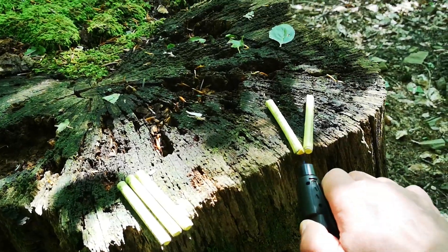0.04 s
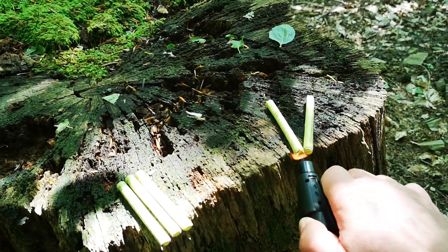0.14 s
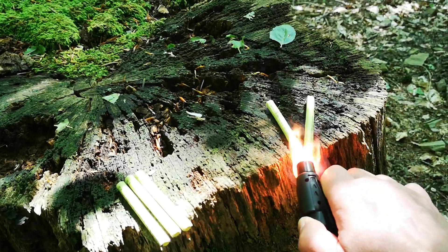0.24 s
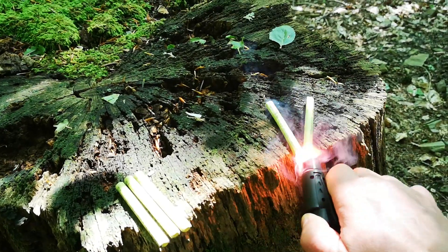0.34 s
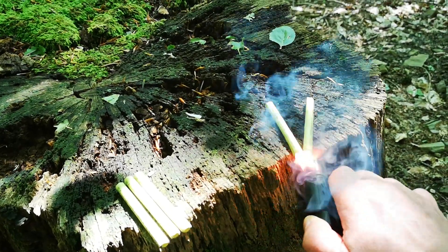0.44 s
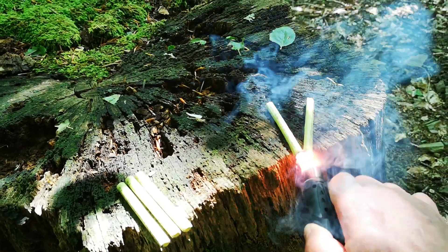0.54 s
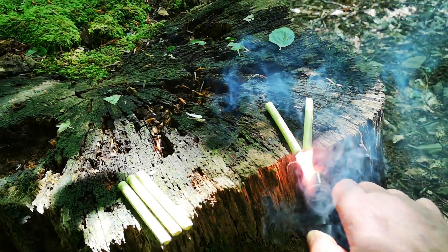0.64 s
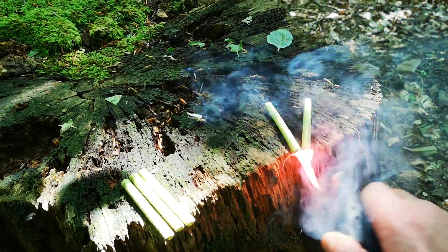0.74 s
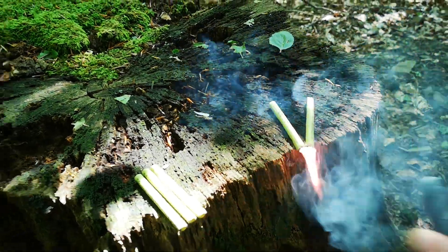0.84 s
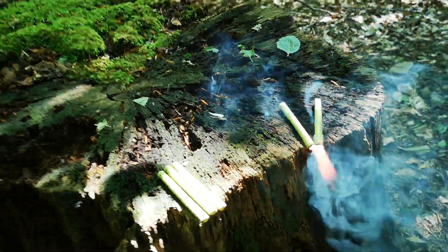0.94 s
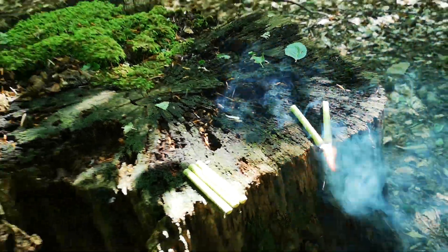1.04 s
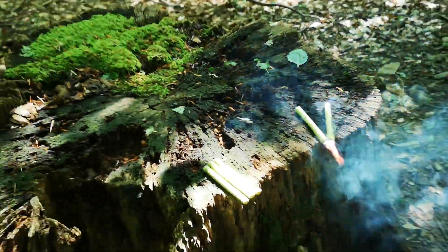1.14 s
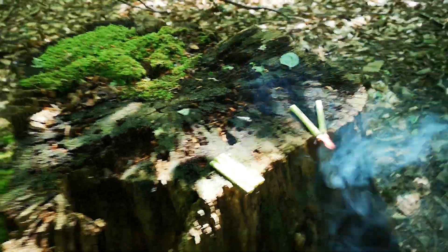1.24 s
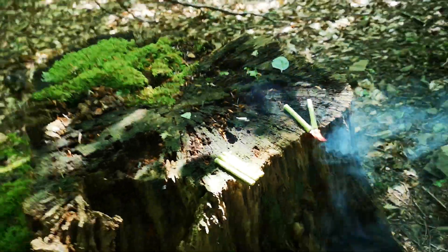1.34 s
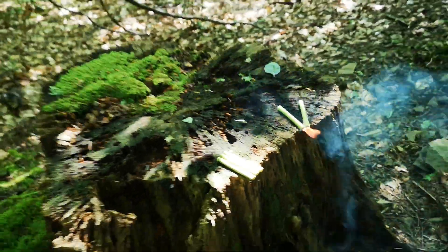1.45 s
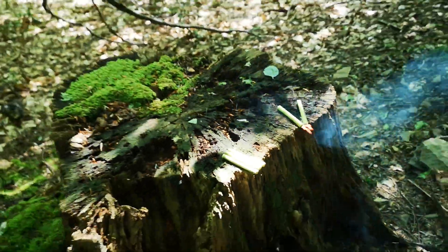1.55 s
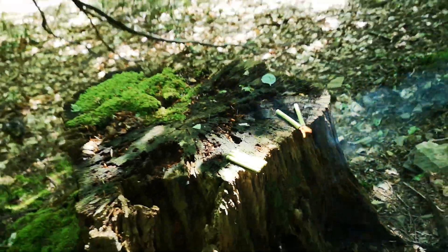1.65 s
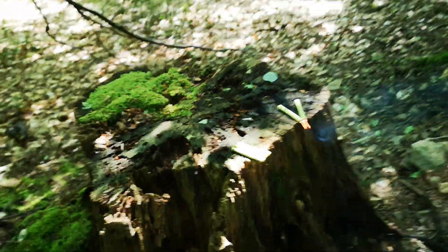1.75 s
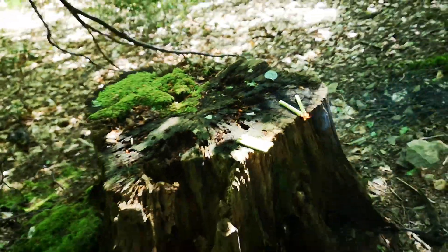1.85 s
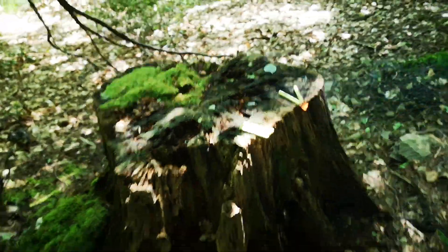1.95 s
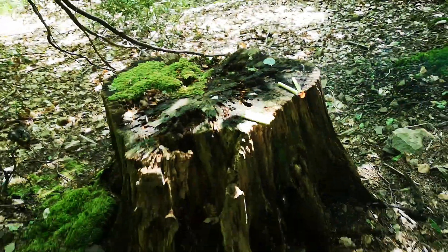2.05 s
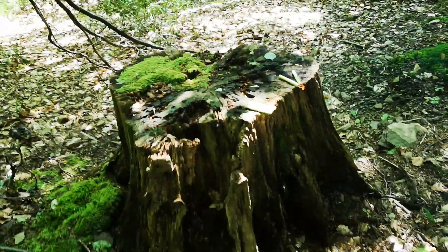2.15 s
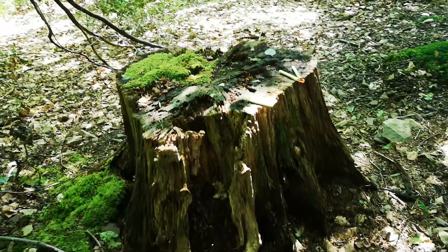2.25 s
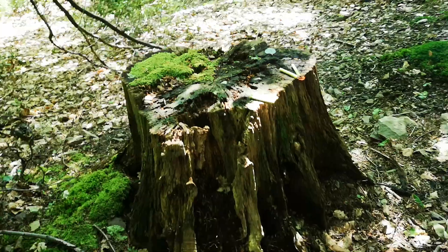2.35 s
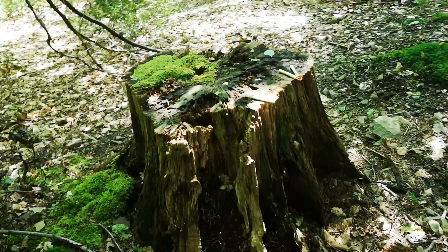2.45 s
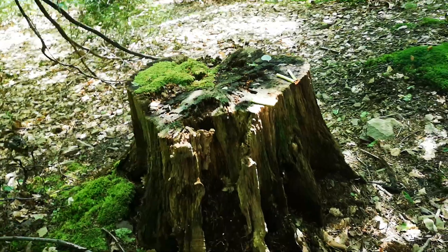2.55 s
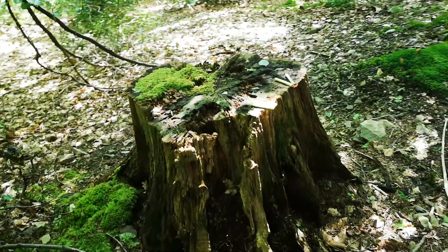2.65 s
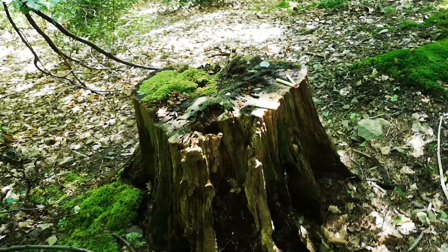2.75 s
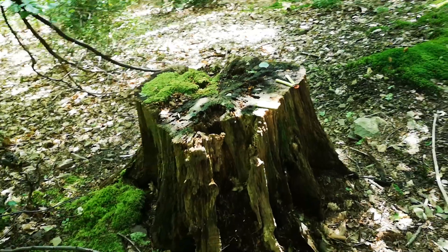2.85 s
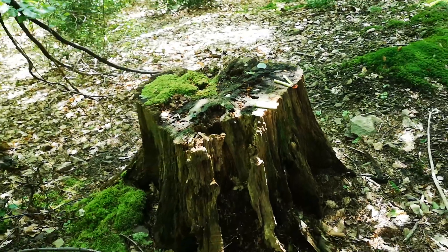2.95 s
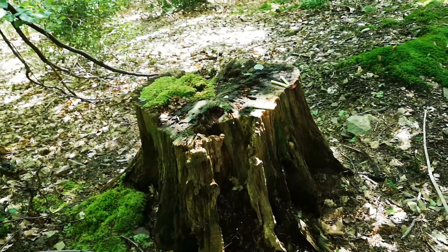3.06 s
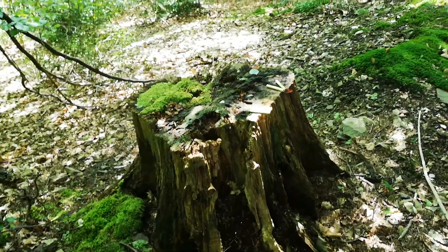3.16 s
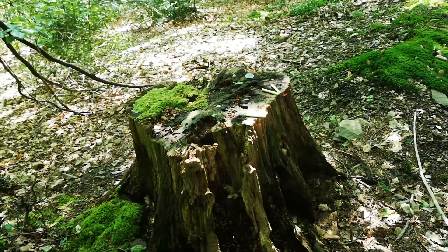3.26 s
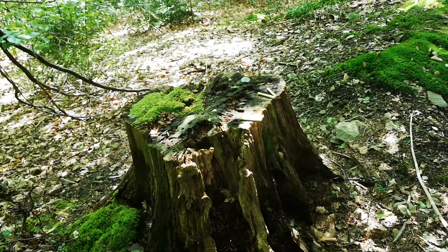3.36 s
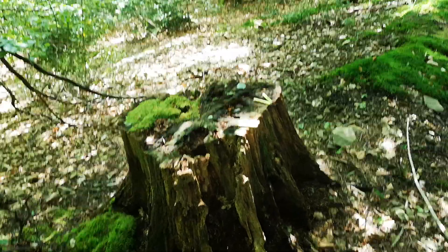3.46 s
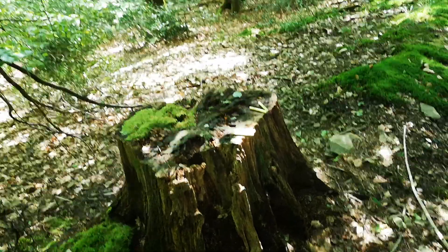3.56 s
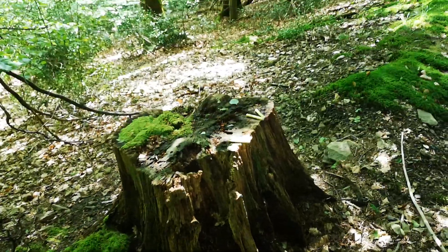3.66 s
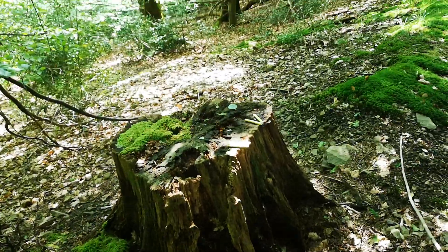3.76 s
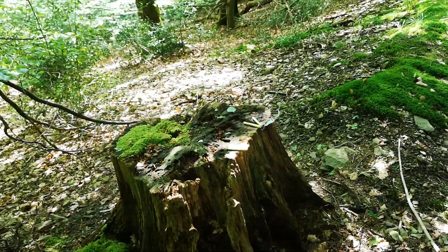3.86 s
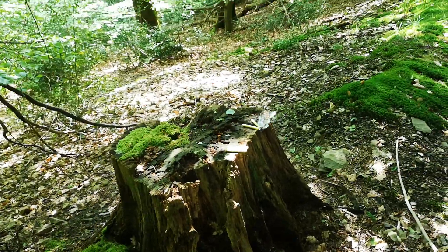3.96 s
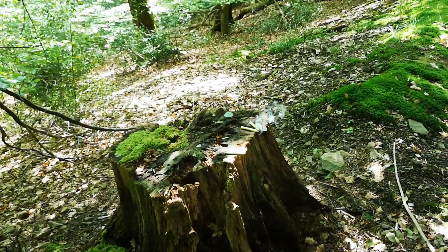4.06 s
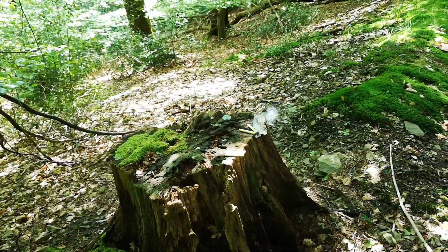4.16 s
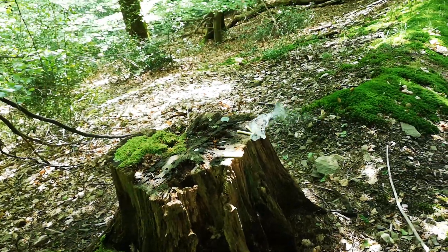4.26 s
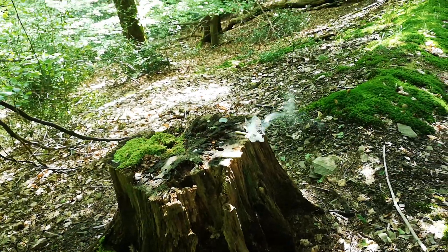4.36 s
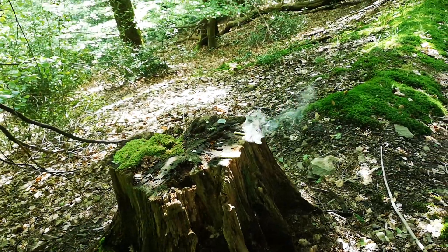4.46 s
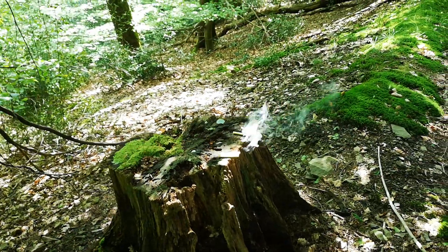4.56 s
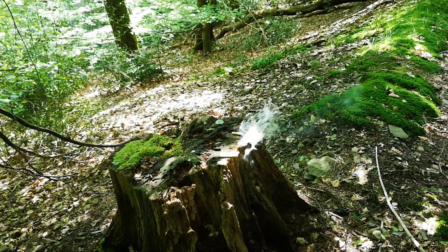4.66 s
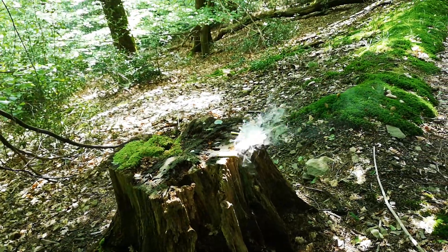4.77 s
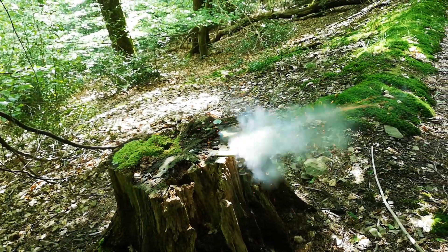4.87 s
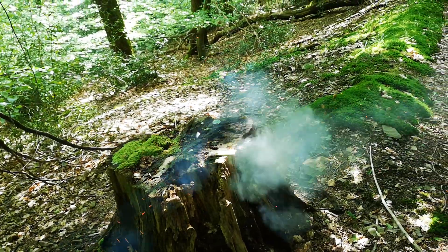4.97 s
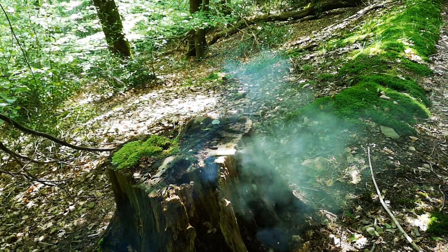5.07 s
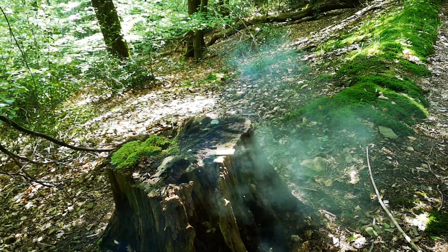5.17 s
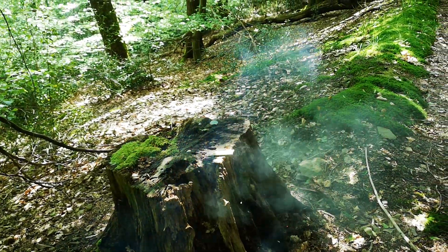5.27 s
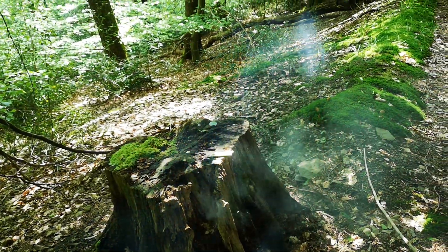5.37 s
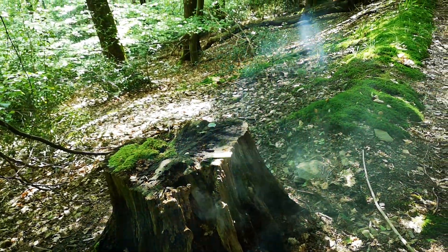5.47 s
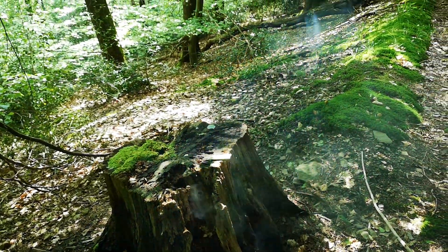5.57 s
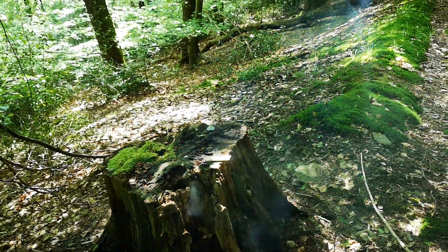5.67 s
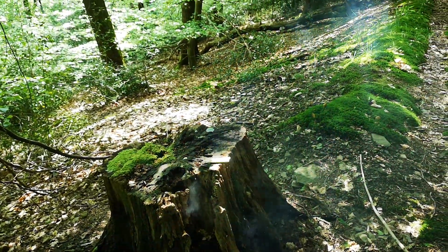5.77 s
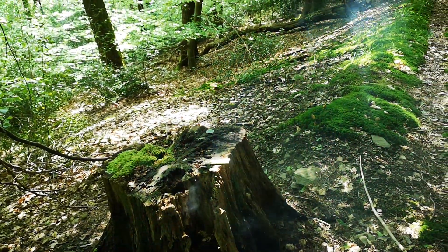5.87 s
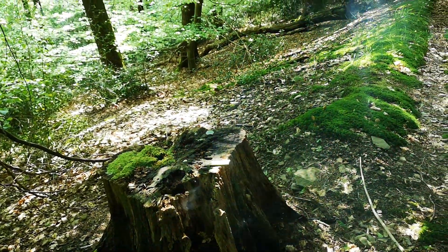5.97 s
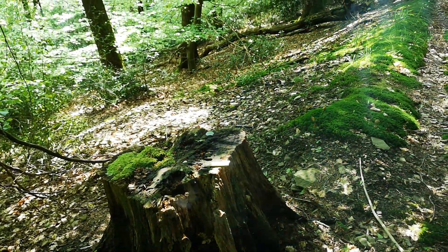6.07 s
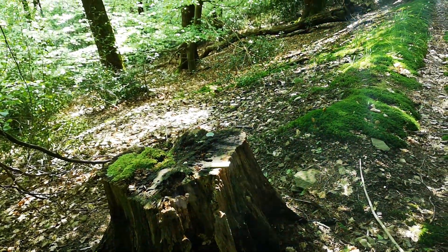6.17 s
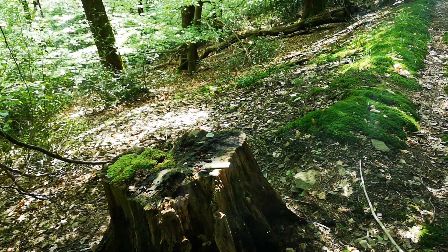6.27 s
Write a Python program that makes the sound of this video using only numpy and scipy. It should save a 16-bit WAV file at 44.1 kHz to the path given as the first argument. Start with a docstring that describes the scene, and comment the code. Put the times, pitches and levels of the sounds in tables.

```python
"""Under a softly rustling canopy, two small firecrackers are lit on a tree stump in a forest. Their fuses flare
and fizz as shaped, grainy noise while someone steps back through dry leaves, heard as knocks, scuffs and
rubbing clothes; a bird calls far off in gliding tones. The crackers burst 30 ms apart as shock waves that
overload the microphone, the trunks scatter the bang back as decaying noise, and scraps patter down on the
leaf litter as short resonant ticks."""
import sys
import numpy as np
from scipy import signal
from scipy.fft import rfft, irfft
from scipy.io import wavfile

SR = 44100
rng = np.random.default_rng(int(sys.argv[2]) if len(sys.argv) > 2 else 0)


def to_wav(s):
    """Save 16-bit WAV."""
    ch = np.atleast_2d(s).T  # columns
    pcm = np.round(np.clip(ch, -1, 1) * 32767)  # PCM
    wavfile.write(sys.argv[1], SR, pcm.astype(np.int16))


N = 278700
TIME = np.arange(N) / SR   # s
BINS = np.maximum(np.fft.rfftfreq(N, 1 / SR), 1)   # Hz


def from_db(db):
    """Logarithmic level: decibels become an amplitude gain."""
    return 10 ** (np.asarray(db) / 20)


def rms_one(x):
    """Normalisation: scale a signal to unit root mean square."""
    return x / np.sqrt(np.mean(x ** 2) + 1e-20)


def held(rows):
    """Linear interpolation of a level over time, held at its ends."""
    times, levels = np.transpose(rows)
    return np.interp(TIME, times, levels)


def at_bins(points):
    """Interpolation over log frequency, read at every spectral bin."""
    hz, value = np.transpose(points)
    return np.interp(np.log(BINS), np.log(hz), value)


def shape(spectrum):
    """Spectral envelope: a gain per bin that falls steeply beyond the ends of the table."""
    lowest_hz, highest_hz = spectrum[0][0], spectrum[-1][0]
    low_skirt = 1 + (lowest_hz / BINS / 2 ** .5) ** 8
    high_skirt = 1 + (BINS / highest_hz / 2 ** .5) ** 8
    skirts = 1 / np.sqrt(low_skirt * high_skirt)
    return rms_one(from_db(at_bins(spectrum)) * skirts + 1e-5)


def filtered(x, hz, kind, order=2):
    """Butterworth filtering: a maximally flat pass band."""
    sos = signal.butter(order, np.clip(hz, 5, .45 * SR), kind, fs=SR, output="sos")
    return signal.sosfilt(sos, x + 1e-18)


def pan(db):
    """Interaural level difference: left and right gains, with the left louder for positive dB."""
    return from_db(np.array([[db], [-db]]) / 2)


def flutter(hz, depth_db):
    """Random amplitude modulation: a gain that wanders more slowly than about hz, with depth as rms."""
    return from_db(depth_db * rms_one(filtered(rng.standard_normal(N), hz, "low")))


# Likeness of the channels in diffuse sound. Each row: frequency in Hz, left-right correlation.
DIFFUSE_LIKENESS = [(30, .99), (170, 0.98), (290, 0.78), (420, 0), (800, 0.0034), (1400, 0.1),
                    (2200, 0.086), (14000, -0.039)]


def noise(spectrum, grain_db=0, likeness=DIFFUSE_LIKENESS):
    """Interchannel coherence: stereo noise mixed from mid and side; uneven grains make it crackle."""
    white = rng.standard_normal((2, N))
    grains = from_db(grain_db * np.minimum(rng.exponential(1, N), 7))
    mid, side = rfft(white * grains)
    alike = np.clip(at_bins(likeness), -1, 1)
    stereo = np.sqrt(1 + alike) * mid + np.sqrt(1 - alike) * side * [[1], [-1]]
    return rms_one(irfft(stereo * shape(spectrum), N))


def decay(s, seconds):
    """Exponential relaxation: an envelope that starts at time s."""
    return (TIME >= s) * np.exp(-np.clip((TIME - s) / seconds, 0, 40))


def shock(s, seconds):
    """Blast wave: a pressure jump followed by a longer suction."""
    return decay(s, seconds) * (1 - (TIME - s) / seconds)


def ring(x, hz, width_hz):
    """Damped resonance: a two-pole filter with about unit gain at its peak."""
    r = np.exp(-np.pi * width_hz / SR)
    numerator = [(1 - r * r) / 2, 0, (r * r - 1) / 2]
    denominator = [1, -2 * r * np.cos(2 * np.pi * hz / SR), r * r]
    return signal.lfilter(numerator, denominator, x + 1e-18)


def swell(s, db, rise, hold, fall):
    """Growth and decay linear in dB: reaches db at time s, holds; rise and fall are seconds per 20 dB."""
    below = np.maximum((s - TIME) / rise, 0) + np.maximum((TIME - s - hold) / fall, 0)
    return from_db(db - 20 * np.minimum(below, 10))


def together(envelopes):
    """Incoherent summation: unrelated sounds add in power."""
    return np.sqrt(sum(e ** 2 for e in envelopes))


# Level of the rustling canopy. Each row: time in seconds, relative level in dB.
CANOPY_LEVEL = [(0, -67.5), (.8, -62.5), (1.9, -60.5), (2.4, -64), (3.8, -66), (4.9, -65.5)]
# Spectrum of the canopy. Each row: frequency in Hz, relative level in dB.
CANOPY_SPECTRUM = [(88, -35), (150, -11), (274, -6), (308, -9.5), (381, -10), (583, -13.5), (796, -8),
                   (1340, -8.5), (1870, 0), (2600, -5.5), (2920, -6.5), (3910, -13.5), (7710, -18.5),
                   (12800, -33.5), (15500, -26.5)]
# Spectrum of wind on the microphone. Each row: frequency in Hz, relative level in dB.
WIND_SPECTRUM = [(8.8, -39), (15, 10), (32, -1), (54, -5.5), (80, -5), (119, -17), (193, -23.5),
                 (500, -34.5), (650, -62), (1100, -120)]
WIND_START_DB, WIND_DB, WIND_RISE_S = -62, -58.5, 1.4   # wind grows from the start over this time
STEP_GUST_S, STEP_GUST_DB = 1.65, -51   # a quick step back pushes air over the microphone
BLAST_GUST_DB, BLAST_GUST_FALL_S = -44, .65   # and so does the blast


def background():
    """Turbulence noise: soft rustle of the canopy and lumpy wind on the microphone."""
    canopy = from_db(held(CANOPY_LEVEL) + 2.0) * noise(CANOPY_SPECTRUM) * pan(-.8)
    breeze = from_db(np.interp(TIME, [0, WIND_RISE_S], [WIND_START_DB, WIND_DB]))
    step = swell(STEP_GUST_S, STEP_GUST_DB, rise=.5, hold=.04, fall=.15)
    blast = swell(BURSTS[1][0], BLAST_GUST_DB, rise=.05, hold=.03, fall=BLAST_GUST_FALL_S)
    wind = together([breeze, step, blast]) * noise(WIND_SPECTRUM) * flutter(20, depth_db=3.0)
    return canopy + wind


# Spectrum of the gas jet. Each row: frequency in Hz, relative level in dB.
FUSE_HISS_SPECTRUM = [(410, -26), (700, -12), (831, -23), (1080, -4.5), (1180, -12.5), (1930, 1.5),
                      (2150, -0.5), (2630, 1.5), (4540, -5.5), (5220, -5), (5680, 1), (6130, -6),
                      (7500, -6), (9000, -35.5), (11700, -34), (19800, -120)]
# Spectrum of the fine sparks. Each row: frequency in Hz, relative level in dB.
FUSE_SIZZLE_SPECTRUM = [(3500, -16), (5800, -6.5), (6800, -5), (7700, 2), (8600, -5), (9500, -4),
                        (11500, -10.5), (15000, -20)]
# Stereo balance of the fuses. Each row: frequency in Hz, left-right difference in dB.
FUSE_BALANCE_BY_BAND = [(300, 0), (600, -17), (1300, -3), (1900, 5), (2900, -14), (4200, -1.5), (6000, 4),
                        (9500, -1), (14000, 0)]
# Spits of the burning fuses. Each row: start in seconds, relative level in dB.
FUSE_SPITS = [(.873, -41.5), (.881, -44), (4.565, -48), (4.783, -34.5)]
# Spectrum of the spits. Each row: frequency in Hz, relative level in dB.
SPIT_SPECTRUM = [(300, -20), (900, -5.5), (2000, 13), (4000, -14), (9000, -7.5), (14000, -22)]
# Likeness of the channels for near sounds. Each row: frequency in Hz, left-right correlation.
STUMP_LIKENESS = [(300, .8), (520, 0), (1100, 0.98), (1800, 1), (2500, -.1), (3700, 0.68), (6000, -0.051),
                  (8000, -0.074), (14000, -0.052)]
# the heads flare up, then burn steadily and fade as the microphone backs away
# levels are before flutter and balance; rises and falls are times for 20 dB
FLARE_S, FLARE_RISE_S, FLARE_HOLD_S, FLARE_FALL_S = .42, .155, .125, .5
FLARE_HISS_DB, FLARE_SIZZLE_DB, FLARE_SIZZLE_FALL_S = -50.6, -56.3, .5
BURN_HISS_DB, BURN_SIZZLE_DB, BURN_HOLD_S, RETREAT_FALL_S = -68.3, -65.8, .8, 1.1


def fuses():
    """Jet noise: burning powder hisses with fine sparks in it, a flare, then a steady burn with spits."""
    burn = swell(FLARE_S, 0, FLARE_RISE_S, BURN_HOLD_S, RETREAT_FALL_S)
    gas_flare = swell(FLARE_S, FLARE_HISS_DB, FLARE_RISE_S, FLARE_HOLD_S, FLARE_FALL_S)
    spark_flare = swell(FLARE_S, FLARE_SIZZLE_DB, FLARE_RISE_S, 0, FLARE_SIZZLE_FALL_S)
    gas = together([gas_flare, from_db(BURN_HISS_DB) * burn])
    sizzle = together([spark_flare, from_db(BURN_SIZZLE_DB) * burn])
    hiss = gas * noise(FUSE_HISS_SPECTRUM, grain_db=2.5, likeness=STUMP_LIKENESS)
    hiss = hiss * flutter(36, depth_db=0.87)
    sparks = sizzle * noise(FUSE_SIZZLE_SPECTRUM, grain_db=2.5, likeness=STUMP_LIKENESS)
    sparks = sparks * flutter(60, depth_db=1.0)
    balance = from_db(at_bins(FUSE_BALANCE_BY_BAND) * [[1], [-1]] / 2)
    jet = irfft(rfft(hiss + sparks) * balance, N)
    spits = sum(from_db(db) * (decay(s, 0.00091) + 0.16 * decay(s, 0.0095)) for s, db in FUSE_SPITS)
    return jet + from_db(-3.0) * spits * noise(SPIT_SPECTRUM, likeness=STUMP_LIKENESS)


# Clothes rubbing as the walker backs away. Each row: peak time in seconds, relative level in dB,
# rise and fall in seconds per 20 dB.
CLOTHES_RUBS = [(.45, -62.5, .25, .6), (1.18, -60, .2, .15), (1.36, -66.5, .15, .4), (1.63, -60.5, .1, .25),
                (1.9, -65, .2, .5), (2.2, -63, .25, .3), (3.15, -67.5, .25, .4), (3.35, -70, .3, .4)]
# Spectrum of the clothes. Each row: frequency in Hz, relative level in dB.
CLOTHES_SPECTRUM = [(90, 1.5), (180, 4), (400, -9.5), (700, -14.5), (1200, -3.5), (2000, -23)]
# Knocks of steps and handling. Each row: start in seconds, relative click level in dB,
# low-pass corner of the click in Hz, thud level in dB, thud frequency in Hz.
STEP_KNOCKS = [(1.351, -42.5, 900, -48, 120), (1.443, -41, 500, -55, 200), (1.578, -54, 1000, -36, 50),
               (1.588, -34, 3000, -25.5, 70), (1.670, -41, 3000, -50, 70), (1.679, -34.5, 800, -38.5, 64.4),
               (1.8053, -26.5, 1500, -23.5, 44), (2.2348, -31.5, 800, -39, 112),
               (3.516, -40, 220, -51, 60.3)]
# Shoes brushing dry leaves. Each row: peak time in seconds, relative level in dB,
# rise in seconds per 20 dB, hold in seconds, fall in seconds per 20 dB; the lift adds its own slopes.
LEAF_SCUFFS = [(2.13, -62.5, .11, .11, .04), (3.07, -52, .05, .02, .4), (3.27, -57, .02, .01, .06),
               (3.51, -64, .12, .02, .12), (3.65, -72, .03, .01, .25)]
# Spectrum of the scuffs. Each row: frequency in Hz, relative level in dB.
SCUFF_SPECTRUM = [(2060, -24), (2900, -12), (3700, -19), (4660, -6), (5910, -10), (7680, -2), (9440, -4.5),
                  (10300, -14.5), (12700, -16.5), (15000, -24)]
LIFT_S, LIFT_FALL_S = .22, .1   # the shoe leaves the ground this long after a scuff peaks; fall per 20 dB


def steps():
    """Impact and friction: dull knocks with a low thud, leaves brushed aside and rubbing clothes."""
    grit_spectrum = [(120, 4), (600, 0.5), (1700, 4.5), (4000, -9), (12000, -8.5)]
    grit = noise(grit_spectrum, likeness=STUMP_LIKENESS)
    knocks = 0
    for s, click_db, bright_hz, thud_db, thud_hz in STEP_KNOCKS:
        click = (decay(s, 0.00096) + 0.19 * decay(s, 0.0074)) * grit + shock(s, 0.00017)
        click = from_db(click_db) * filtered(click, bright_hz, "low", order=1)
        thud = decay(s, 0.86 / thud_hz) * np.sin(2 * np.pi * thud_hz * (TIME - s))
        knocks = knocks + click - from_db(thud_db) * thud
    brushing = together(swell(s, db, rise, hold, fall) * swell(s, 0, 1, LIFT_S, LIFT_FALL_S)
                        for s, db, rise, hold, fall in LEAF_SCUFFS)
    leaves = brushing * noise(SCUFF_SPECTRUM, grain_db=4) * flutter(80, depth_db=0.2)
    rubbing = together(swell(s, db, rise, 0, fall) for s, db, rise, fall in CLOTHES_RUBS)
    clothes = rubbing * noise(CLOTHES_SPECTRUM)
    return knocks + from_db(-1.5) * leaves * pan(0.53) + from_db(1) * clothes


# Leaves ticking under a spark, a shoe or a falling scrap. Each row: time in seconds (the touch begins
# 0.83 ms later), level of the touch in dB before resonance, resonance in Hz.
TOUCHED_LEAVES = [(0.8717, -42.5, 7150), (3.275, -52, 7000), (3.4123, -52, 9370), (3.6384, -46.5, 7100),
                  (3.6767, -57, 6830), (5.5288, -47, 7400), (5.619, -54, 10000), (5.6564, -57, 11000),
                  (5.7232, -45.5, 8550), (5.823, -54, 8100), (5.9085, -60, 11000), (5.952, -57, 10500),
                  (5.9584, -58, 6030), (5.9774, -58, 10000), (5.9914, -58, 10500), (6.0069, -48.5, 5700),
                  (6.2831, -53, 7600)]
# Showers of paper scraps and grit. Each row: peak time in seconds, level in dB before flutter.
SCRAP_SHOWERS = [(5.6, -62), (5.96, -72)]
# Spectrum of the showers. Each row: frequency in Hz, relative level in dB.
PATTER_SPECTRUM = [(4500, -6), (7000, 4), (9500, -4), (12000, -6), (15000, -10)]
SHOWER_RISE_S, SHOWER_FALL_S = .09, .22   # per 20 dB


def leaf_ticks():
    """Excited resonance: each touched leaf ticks at a pitch of its own; later, finer scraps patter down."""
    crackle = noise([(2500, -6), (6000, 2), (10000, -4), (14000, -7)], grain_db=2)
    ticks = 0
    for s, db, hz in TOUCHED_LEAVES:
        touch = from_db(db) * decay(s + 0.00083, 0.0023) * crackle
        ticks = ticks + (2.0 * ring(touch, hz, 750) + 0.17 * touch) * pan(rng.normal(0, 2))
    showers = together(swell(s, db, SHOWER_RISE_S, 0, SHOWER_FALL_S) for s, db in SCRAP_SHOWERS)
    return ticks + showers * noise(PATTER_SPECTRUM, grain_db=6.5) * flutter(110, depth_db=3.0)


# Notes of a distant bird. Each row: start in seconds, length in seconds, start frequency in Hz,
# end frequency in Hz, relative level in dB.
BIRD_NOTES = [(1.47, .2, 2620, 2900, -65), (1.64, .26, 3150, 3350, -64), (2.35, .11, 2980, 3140, -59.5),
              (2.46, .1, 3130, 3240, -64), (2.585, .04, 3720, 3580, -66), (2.83, .1, 3000, 2950, -65),
              (4.15, .1, 2880, 2880, -64.5)]
# A faint far hoot. Each row: start in seconds, length in seconds, start frequency in Hz,
# end frequency in Hz, relative level in dB.
HOOT_NOTES = [(3.23, .16, 400, 415, -73), (3.5, .24, 425, 418, -72.5)]
NOTE_EDGE_S = .03   # a note swells and dies within this time


def far_call(notes, smear_hz):
    """Multiple scattering: thin gliding notes, smeared by the trees in amplitude and phase."""
    call = 0   # complex, so that both quadratures can wander
    for s, length, start_hz, end_hz, db in notes:
        glide_hz = np.interp(TIME, [s, s + length], [start_hz, end_hz])
        phase = 2 * np.pi * np.cumsum(glide_hz) / SR
        inside = np.minimum(TIME - s, s + length - TIME)
        edges = np.clip(inside / NOTE_EDGE_S + .5, 0, 1)
        call = call + from_db(db) * edges * np.exp(1j * phase)
    smear = rms_one(filtered(rng.standard_normal((2, 2, N)), smear_hz, "low"))
    return from_db(-3.0) * (smear[0] * call.imag + smear[1] * call.real)


JOLT_S, JOLT_DB, JOLT_HZ = 1.805, -26.5, 8


def jolt():
    """Inertial sway: the heaviest step rocks the microphone, a slow pressure wobble with a soft rumble."""
    sway = swell(JOLT_S + .03, JOLT_DB, rise=.017, hold=.05, fall=.13)
    wobble = np.sin(2 * np.pi * JOLT_HZ * (TIME - JOLT_S))
    rumble = from_db(-12.5) * noise([(20, 12.5), (60, -3), (150, -25)])
    return sway * (wobble + rumble)


# The two bursts. Each row: time in seconds, relative shock level in dB, relative shattering level in dB,
# shattering decay in seconds, lag of the left channel in seconds, left-right difference of the shock in dB.
BURSTS = [(4.9915, 6.5, -1.5, 0.0065, .00006, 1.5), (5.0220, -5.5, -10, 0.0029, 0.000082, 8)]
# Spectrum of the shattering. Each row: frequency in Hz, relative level in dB.
BURST_SPECTRUM = [(100, -11), (250, -13.5), (380, -1), (520, -9), (720, -4), (1000, -13), (1550, -4.5),
                  (2100, -7), (2500, -10), (2900, -3), (3800, -13.5), (4700, -15), (5400, -10), (6500, -17),
                  (7900, -14), (10000, -27), (12000, -32), (15000, -42)]
# Low pushes of the expanding gas. Each row: start in seconds, level in dB before the low-pass,
# decay in seconds.
GAS_PUSHES = [(4.9945, -7.5, 0.0069), (5.0225, -11.5, 0.013)]


def bangs():
    """Shock radiation: each case bursts with a blast wave; stump and ground break it into a dense crash."""
    crash, wave = 0, 0
    for s, shock_db, shatter_db, seconds, lag, side_db in BURSTS:
        crash = crash + from_db(shatter_db) * (decay(s, seconds) + from_db(-25.5) * decay(s, 0.017))
        two_sides = np.array([shock(s + lag, .0002), shock(s, .0002)])
        wave = wave + from_db(shock_db) * two_sides * pan(side_db)
    crash = crash * noise(BURST_SPECTRUM)
    treble = filtered(crash, 4000, "high", order=1)
    crash = (crash - treble) * pan(-1.5) + treble * pan(4)
    # the shock comes again off the ground, and both set the microphone ports ringing
    wave = wave + .6 * np.roll(wave, round(0.0012 * SR), axis=1)
    ports = 1.9 * ring(wave, 1570, 330) - 2.0 * ring(wave, 2850, 350) + 1.3 * ring(wave, 5400, 600)
    # the second push arrives as suction
    push = sum((-1) ** k * from_db(db) * decay(s, seconds) for k, (s, db, seconds) in enumerate(GAS_PUSHES))
    return crash + 0.94 * filtered(wave, 4500, "low") + ports + filtered(push, 110, "low", order=1)


# Groups of trunks that scatter the bang back. Each row: delay in seconds, relative level in dB,
# rise in seconds per 20 dB, hold in seconds, fall in seconds per 20 dB.
TRUNK_GROUPS = [(.11, -29.7, .25, .17, .21), (.4, -39.2, .3, .17, .33), (.88, -60.5, .4, .08, .8)]
# Spectrum of the returning body. Each row: frequency in Hz, relative level in dB.
ECHO_BODY_SPECTRUM = [(60, -7), (168, -7), (270, -10), (400, -10), (554, -8.5), (950, -1.5), (1150, -2),
                      (1700, 1), (2100, 0.5), (2710, -6), (3300, -12.5), (4500, -23)]
# Spectrum of the returning treble. Each row: frequency in Hz, relative level in dB.
ECHO_TREBLE_SPECTRUM = [(2200, -12), (2900, 5), (4000, 3), (5500, 2), (7700, 0.5), (9500, -9.5),
                        (12000, -27), (15000, -36.5)]
ECHO_BODY_DB, ECHO_TREBLE_DB = 1.2, 1.2   # relative to the trunk groups
TREBLE_LOSS_DB_PER_S = 35   # air and leaves absorb treble on the way


def forest_echo():
    """Diffuse scattering: countless small echoes off trunks and slope; the far ones come back duller."""
    fired = BURSTS[0][0]
    groups = together(swell(fired + delay, db, rise, hold, fall)
                      for delay, db, rise, hold, fall in TRUNK_GROUPS)
    returned = (TIME > fired) * groups
    absorbed = from_db(ECHO_TREBLE_DB - TREBLE_LOSS_DB_PER_S * np.maximum(TIME - fired, 0))
    body = noise(ECHO_BODY_SPECTRUM, grain_db=2.5) * pan(-0.66)
    treble = noise(ECHO_TREBLE_SPECTRUM, grain_db=1.5) * pan(1.5)
    # every trunk returns both bursts, one just after the other
    gap = round((BURSTS[1][0] - BURSTS[0][0]) * SR)
    body, treble = [rms_one(x + .5 * np.roll(x, gap, axis=1)) for x in (body, treble)]
    echo = body * from_db(ECHO_BODY_DB) + absorbed * treble
    return returned * echo * flutter(70, depth_db=0.7)


SWING_HZ, SWING_PEAK_S, SWING_DB = 2.85, 5.235, -13


def overload_swing():
    """Damped recovery: the overloaded microphone's pressure offset swings slowly to rest, with a rumble."""
    since = TIME - BURSTS[1][0]
    swing = (since > 0) * swell(SWING_PEAK_S, SWING_DB, rise=.36, hold=.025, fall=.15)
    rumble = from_db(-31) * noise([(12, 2), (30, -7.5), (60, -18), (120, -31)])
    return swing * (np.sin(2 * np.pi * SWING_HZ * since) + rumble)


def scene():
    """Superposition: the pressures of all sources add at the microphone."""
    calls = far_call(BIRD_NOTES, smear_hz=60) + far_call(HOOT_NOTES, smear_hz=30)
    crackers = fuses() + bangs() + overload_swing() + forest_echo()
    return crackers + steps() + jolt() + leaf_ticks() + calls + background()


CUTOFF_HZ = 15200


def record(dry):
    """Saturation and band limiting: the bang overloads the input, and the top is cut."""
    clipped = dry / (1 + dry ** 6) ** (1 / 6)
    return signal.sosfilt(signal.ellip(10, .1, 70, CUTOFF_HZ, fs=SR, output="sos"), clipped)


dry = scene()
out = record(dry)
to_wav(out)
```